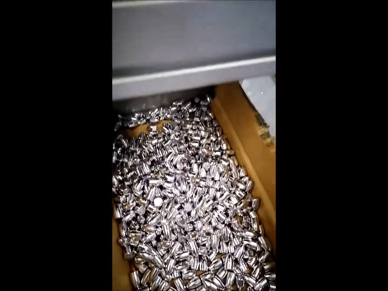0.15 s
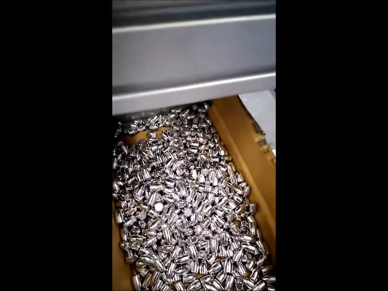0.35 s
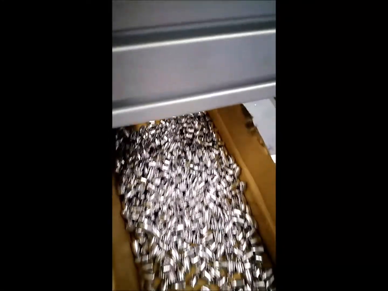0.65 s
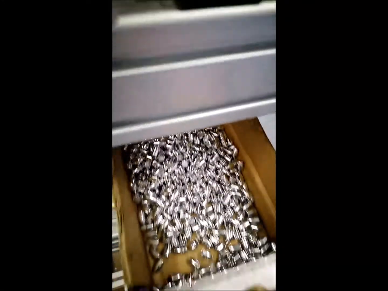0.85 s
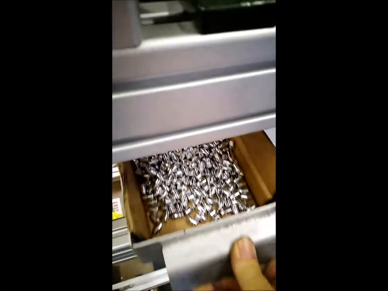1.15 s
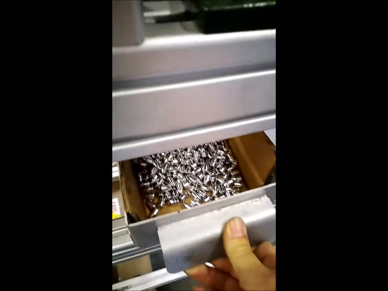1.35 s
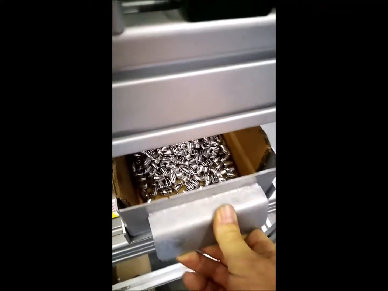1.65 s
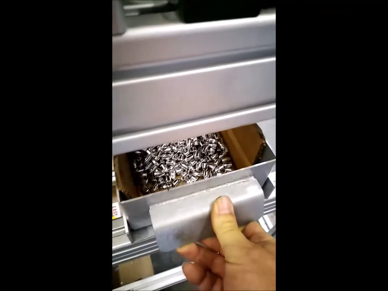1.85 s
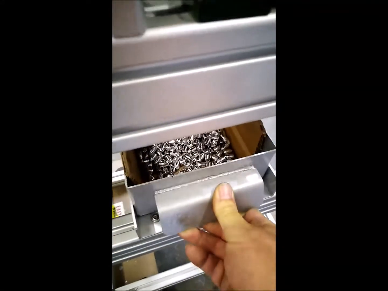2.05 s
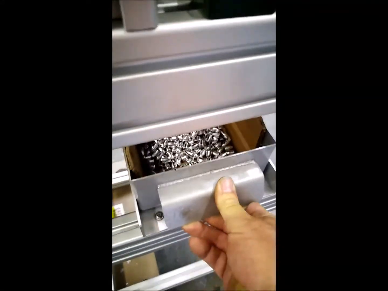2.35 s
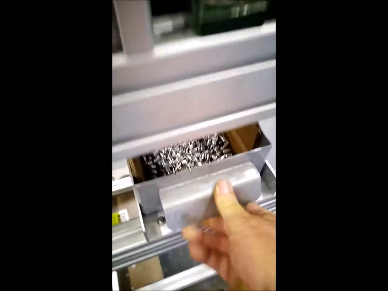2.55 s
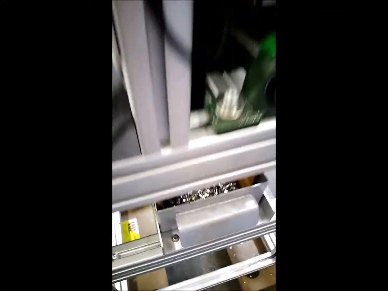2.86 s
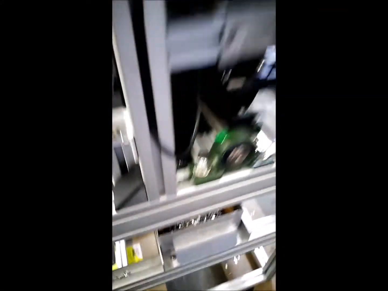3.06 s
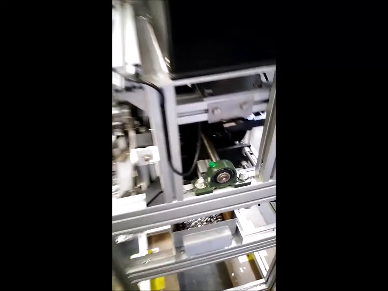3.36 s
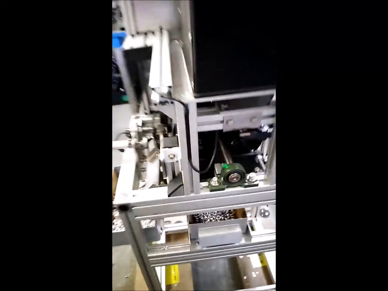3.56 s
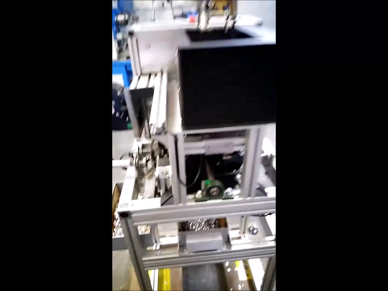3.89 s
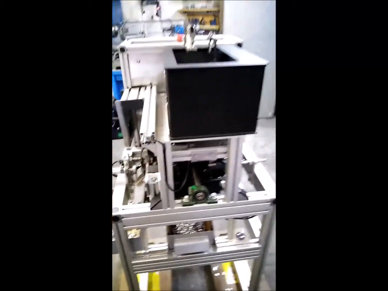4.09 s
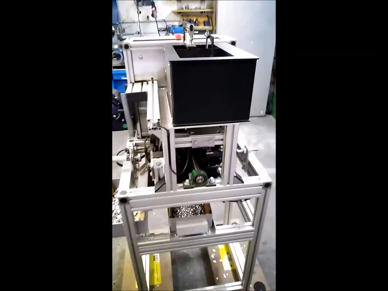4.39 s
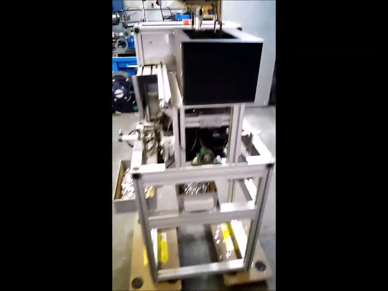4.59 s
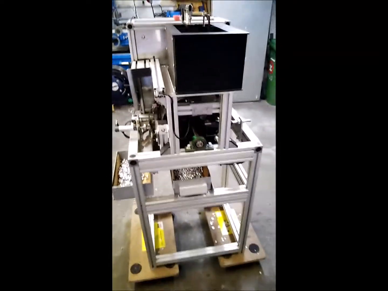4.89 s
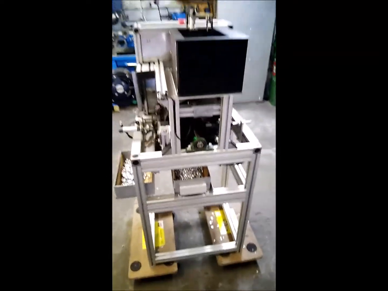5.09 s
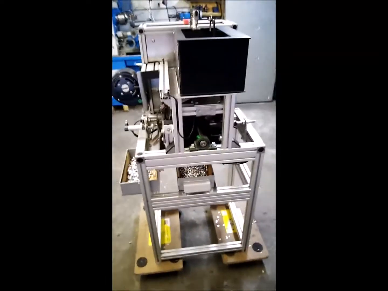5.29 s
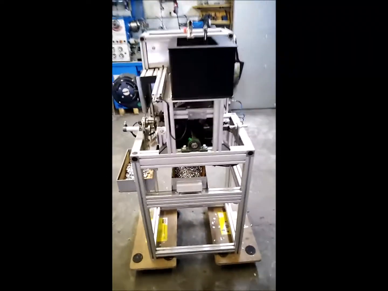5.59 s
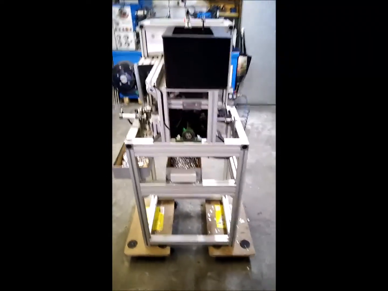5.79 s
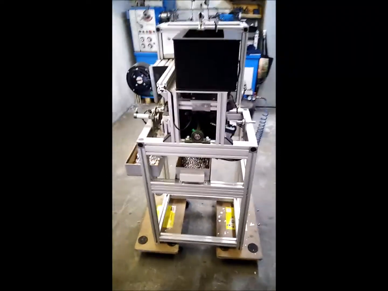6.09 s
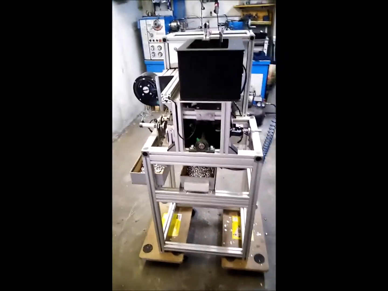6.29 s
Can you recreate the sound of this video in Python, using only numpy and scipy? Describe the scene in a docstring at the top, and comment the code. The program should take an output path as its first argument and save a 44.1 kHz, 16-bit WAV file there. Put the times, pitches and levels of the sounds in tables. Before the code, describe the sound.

A metal tray of small parts scrapes and rustles shut, then a workshop machine fires volleys of crashing steel blows over a whining motor.

```python
"""An automatic casting machine in a hard-walled workshop: noise bursts shaped by the frame's modes make the steel blows.
First come light blows and thumps; a hand pulls out a tray of metal parts, which scrapes (noise) and rustles (tiny rings).
Volleys follow, with bouncing slugs, singing modes, hollow knocks, clanks and dull thumps, over a motor's whine and whirr.
The motor fades as the microphone backs away; squeaks (narrow noise) and shifts of the grip lead to the last volley.
A noise suppressor turns down the pauses throughout."""
import sys
import numpy as np
from scipy import signal
from scipy.fft import rfft, irfft, next_fast_len
from scipy.io import wavfile
from scipy.ndimage import map_coordinates

SR = 44100
rng = np.random.default_rng(int(sys.argv[2]) if len(sys.argv) > 2 else 0)


def bounce(signal):
    """Save signal as a 16-bit WAV file at the path given by the first command-line argument."""
    frames = np.transpose(np.atleast_2d(signal))
    limited = np.clip(frames, -1, 1)
    pcm = np.round(limited * 32767).astype(np.int16)
    wavfile.write(sys.argv[1], SR, pcm)


N = 284004

TIME = np.arange(N) / SR
BLOW_SAMPLES = 3 * SR // 2
CLASH_HZ = 3200  # where the midrange clank gives way to the treble clash


# Steel blows. Each row: start in seconds, level in dB, hardness as treble over midrange in dB,
# tilt of the treble in dB per octave.
STEEL_BLOWS = [(0.142, -27.5, 8.5, -15), (.176, -34.5, 2.5, -10), (.753, -20, -15.5, 8),
               (1.344, -18.5, 6, -2), (1.372, -17, -8, 2), (1.396, -7.5, -0.5, -1), (1.451, -6.5, -6.5, -1),
               (1.472, -17, -5, 3), (1.523, -5, -20, 17), (1.534, 0.5, 3.5, 2), (1.587, -1.5, 4, 7),
               (1.601, -2, -6.5, 3), (1.843, 4, 11, 3), (1.866, -2.5, -25, 16), (1.93, -2.5, 3, -0.5),
               (2.562, -13.5, 8.5, 15), (2.583, -12, 7, -1), (2.609, -8, 6, 6.5), (2.835, -6, 14.5, 5.5),
               (3.078, -13, 6.5, -8), (3.177, -17, 9, 7), (3.229, -9.5, 6, 3.5), (4.423, -40, 6, -3),
               (4.44, -30.5, 5, -8.5), (5.666, -21, 7.5, 3), (5.713, -15, -19, 11),
               (5.775, -9.5, -6.5, -2.5), (5.844, -4, 2.5, -5), (5.914, -3, 2, -3), (6.165, -3, 11.5, -4.5),
               (6.193, -5, -1.5, 12), (6.226, -8.5, 21, 5), (6.278, -6, 9, 3), (6.325, -12, 3, -6)]
# Path to the moving microphone. Each row: time in seconds, room sound in dB, direct sound in dB.
MICROPHONE_PATH = [(0, -10, 4.5), (1.3, -15, -1), (2.7, -3, 7), (3.3, -3.5, 4.5), (4.4, -6, 1),
                   (5.66, -10, -5.5), (5.85, -6.5, -0.5)]


def blows(knock_hz=1100, tilt_hz=7500, snap_db=-4, snap_t60=0.022, ring_t60=0.11, build=0.0065,
          chatter_db=3, rattle_db=0.42, attack=0.005, air_hz=10000, edge_db=7, spot_db=4.5, spot_hz=60):
    """Impact excitation: each blow chatters on the frame, rings briefly and swells into a diffuse room tail."""
    knock_level_db, knock_slope = -3, 0.034  # bass against midrange; dB lost per dB of hardness
    shortening = 0.027  # dB of ring time lost per dB of hardness
    room_t60, room_treble_t60 = 1.328, 0.78  # s
    t, hz = np.arange(BLOW_SAMPLES) / SR, np.fft.rfftfreq(BLOW_SAMPLES, 1 / SR)
    low = 1 / (1 + (hz / knock_hz) ** 8)
    high = 1 - 1 / (1 + (hz / CLASH_HZ) ** 8)
    # heavy contacts stir the low modes, hard ones the high modes
    registers = frame_power(hz) * np.array([low, (1 - low) * (1 - high), high ** 3])
    octaves = np.log2(np.maximum(hz, CLASH_HZ) / tilt_hz)
    # the direct sound keeps a sharp top that the room swallows
    edge = amp(along([(air_hz * .9, 0), (air_hz * 1.2, edge_db)], hz))
    ears, out = spread(hz), np.zeros((2, N))
    # bouncing contacts roughen the blow, loose parts roughen its tail
    chatter = unit(amp(chatter_db * wobble(600, size=N + BLOW_SAMPLES)))
    rattle = unit(amp(rattle_db * wobble(140, size=N + BLOW_SAMPLES)))
    swell = 1 - np.exp(-t / build)
    tails = [swell * fade(t, room_t60), swell * fade(t, room_treble_t60)]
    room_db, direct_db = curves(MICROPHONE_PATH)
    for s, db, hardness_db, tilt_db in STEEL_BLOWS:
        start = round(s * SR)
        stop = start + BLOW_SAMPLES
        direct_gain, room_gain = amp(direct_db[start]), amp(room_db[start])
        power = amp([knock_level_db - knock_slope * hardness_db, 0, hardness_db]) ** 2
        colour = registers * amp(tilt_db * octaves) ** 2
        knock, clank, clash = colour * (power / colour.sum(1) / power.sum())[:, None]
        # each blow lands on another spot and favours other modes
        spot = amp(spot_db * wobble(SR / spot_hz * hz[1], size=len(hz)) * hz / (hz + knock_hz))
        # distance blurs the attack as it weakens the direct sound
        rise = 1 - np.exp(-t * direct_gain / attack)
        decay = fade(t, ring_t60 * amp(-shortening * hardness_db)) + amp(snap_db) * fade(t, snap_t60)
        struck = noise(spot * np.sqrt(knock + clank + clash) * edge, ears)
        direct = rise * decay * chatter[start:stop] * struck
        room = 0
        for part, tail in zip([knock + clank, clash], tails):
            room = room + tail * np.sqrt(part.sum()) * noise(spot * np.sqrt(part / edge), ears)
        add(out, s, amp(db) * (direct_gain * direct + room_gain * rattle[start:stop] * room))
    return out


# Colour of the struck machine. Each row: frequency in Hz, relative density in dB per Hz.
STEEL_COLOUR = [(30, -40), (120, -19), (155, -13.5), (253, -5.5), (428, -11.5), (740, -5), (1000, -6.5),
                (1310, -2), (2170, 4), (2750, 1), (3200, -1.5), (5600, 4), (6500, 8), (7600, 13.5),
                (9150, 6.5), (10300, -1.5), (14000, -22)]
# Broad resonances and antiresonances of the frame. Each row: frequency in Hz, gain in dB.
FRAME_HUMPS = [(1033, -3), (3057, -3.5), (4134, 4), (7708, 3.5)]


def frame_power(hz, hump_hz=65, fine_db=1.8, fine_hz=25):
    """Modal density: crowded modes give the frame's power response humps and ripples."""
    humps = sum(db * np.exp(-((hz - f) / hump_hz) ** 2) for f, db in FRAME_HUMPS)
    ripples = fine_db * wobble(SR / fine_hz * hz[1], size=len(hz))
    return amp(along(STEEL_COLOUR, hz) + humps + ripples) ** 2


def rebounds(count=10, scatter_db=3, t60=0.02, low_hz=1600, high_hz=10000):
    """Inelastic rebound: slugs jump at each blow and land at uneven moments, the later the weaker."""
    mean_wait, level_db, loss_db_per_s = .11, -6.5, 58  # s, dB against the blow, dB per s of wait
    t, out = np.arange(SR // 20) / SR, np.zeros((2, N))
    for s, db, hardness_db, *_ in STEEL_BLOWS:
        for wait in rng.exponential(mean_wait, count):
            hz = low_hz * (high_hz / low_hz) ** rng.random(6)
            weights = amp(along(STEEL_COLOUR, hz) + hardness_db * (hz > CLASH_HZ))
            weights = weights * rng.standard_normal((2, len(hz)))
            tones = np.sin(2 * np.pi * hz[:, None] * t)
            clink = weights / np.linalg.norm(weights) @ tones * fade(t, t60)
            landing_db = db + level_db - loss_db_per_s * wait + scatter_db * rng.standard_normal()
            add(out, min(s + wait, TIME[-1]), amp(landing_db) * clink)
    return out


# Square hits that set the clearest modes singing. Each row: start in seconds, level in dB.
SQUARE_HITS = [(1.602, -28), (1.93, -16), (2.837, -30.5), (6.225, -18)]
# The frame's clearest modes. Each row: frequency in Hz, level in dB before random variation.
CLEAR_MODES = [(1748, -9.5), (1942, -1.5), (2094, -1.5), (4860, -10.5), (5771, -8), (6208, -2), (6676, -3),
               (6885, -1), (7253, -4), (7745, -4.5), (7827, -4), (8135, -8), (8869, -5.5), (9178, -3.5)]


def singing(t60=0.78, attack=0.007, vary_db=-2.5, waver=0.5):
    """Modal ringing: lightly damped modes sing on, in a new mixture for each hit and each ear."""
    t, out = np.arange(SR) / SR, np.zeros((2, N))
    for s, db in SQUARE_HITS:
        for hz, level_db in CLEAR_MODES:
            phase = 2 * np.pi * (hz * t + rng.random((2, 1))) + waver * wobble(30, size=SR)
            gain = amp(db + level_db + vary_db * rng.standard_normal((2, 1)))
            add(out, s, gain * np.sin(phase) * fade(t, t60) * (1 - np.exp(-t / attack)))
    return out


# Hollow knocks, and the short midrange clanks that ring with steel blows. Each row: start in seconds,
# pitch in Hz, level in dB before the microphone path.
KNOCKS_AND_CLANKS = [(0.132, 420, -24.5), (1.398, 1590, -16), (1.451, 540, -6), (1.459, 2120, -5),
                     (1.6, 1750, 3), (1.609, 800, -7), (1.978, 2160, -8.5), (2.57, 610, -16),
                     (2.974, 696, -13), (3.025, 800, -13), (3.027, 1470, -18.5), (3.047, 755, -11.5),
                     (3.081, 427, -13.5), (3.174, 687, -16), (3.229, 2360, -15.5), (4.44, 562, -21),
                     (4.44, 1525, -22), (4.444, 900, -25.5), (5.695, 724, -18.5), (5.849, 1464, -5.5),
                     (5.864, 600, -12), (5.915, 1364, -2)]


def knocks_and_clanks(attack=0.0032, t60=0.042, width_hz=210, echo_db=-8, build=0.0086, room_t60=0.87):
    """Damped resonance: each knock or clank is a short ring of noise around its pitch, with a room echo."""
    t, hz, out = np.arange(SR) / SR, np.fft.rfftfreq(SR, 1 / SR), np.zeros((2, N))
    ears, (room_db, direct_db) = spread(hz), curves(MICROPHONE_PATH)
    direct = (1 - np.exp(-t / attack)) * fade(t, t60)
    echo = (1 - np.exp(-t / build)) * fade(t, room_t60)
    for s, centre, db in KNOCKS_AND_CLANKS:
        start = round(s * SR)
        shape = amp(direct_db[start]) * direct + amp(room_db[start] + echo_db) * echo
        resonance = 1 / (1 + (2 * (hz - centre) / width_hz) ** 2) * hz / (hz + width_hz)
        add(out, s, amp(db) * shape * noise(resonance, ears))
    return out


# Pull on the tray. Each row: time in seconds, effort in dB, groan of the rails in Hz.
TRAY_PULL = [(.48, -12.5, 395), (0.559, -5, 410), (0.657, 0, 430), (0.799, -0.5, 440), (0.9, -.5, 515),
             (1.1, -3, 505), (1.358, -4.5, 530)]
# Scrape of the rails. Each row: frequency in Hz, relative density in dB per Hz.
SCRAPE_COLOUR = [(50, -59), (200, -19.5), (330, -13), (510, 1), (570, -6), (650, 3.5), (850, -7.5),
                 (1100, -24), (2500, -71)]
# Rustle of the small parts. Each row: frequency in Hz, relative density in dB per Hz.
PARTS_COLOUR = [(250, -60), (900, 1.5), (1950, 0.5), (2700, -3.5), (3500, -10.5), (5500, -9), (8300, -4),
                (14000, -28)]


def tray(scrape_db=-32.0, groan_db=-38, left_db=-4, right_db=2, rustle_db=-32, rustle_grows=1.77,
         grain_db=-0.6, clink_db=-4):
    """Stick-slip friction: the tray groans on its rails; a harder pull jostles the parts more."""
    slip_db, slip_rate = 1.2, 140  # unevenness in dB, knots per second
    effort_db, groan_hz = curves(TRAY_PULL)
    moving = np.interp(TIME, [.47, .49, 1.38, 1.45], [0, 1, 1, 0])
    rubbing = amp(scrape_db + effort_db) * rush(SCRAPE_COLOUR)
    groan = amp(groan_db + 0.66 * effort_db) * band(groan_hz, width_hz=45)[0]
    slips = unit(amp(slip_db * wobble(slip_rate)))
    scrape = amp([[left_db], [right_db]]) * slips * (rubbing + groan)
    rustle = unit(amp(grain_db * wobble(550))) * rush(PARTS_COLOUR, ripple_db=4)
    parts = amp(rustle_db + rustle_grows * effort_db) * (rustle + amp(clink_db) * clinks())
    return moving * (scrape + parts)


def clinks(count=1500, scatter_db=3.0):
    """Random collisions: a dense stream of tiny rings, each at its own pitch and place."""
    t, out = np.arange(SR // 50) / SR, np.zeros((2, N))
    start, span = TRAY_PULL[0][0], TRAY_PULL[-1][0] - TRAY_PULL[0][0]
    for when, pitch, size, left, right in rng.random((count, 5)):
        hz, t60 = 1300 * 7 ** pitch, .015
        gain = amp(along(PARTS_COLOUR, hz) - scatter_db * np.log(size + 0.024)) * np.sqrt(hz)
        ring = np.sin(2 * np.pi * hz * t) * fade(t, t60)
        add(out, start + when * span, gain * np.array([[left], [right]]) * ring)
    return unit(out) * np.sqrt(span * SR / N)  # rms 1 over the span of the pull


# Dull thumps on the frame. Each row: start in seconds, level in dB, decay time t60 in seconds.
FRAME_THUMPS = [(0.135, -41, 0.32), (0.75, -32.5, 0.49), (2.568, -33, 0.45), (2.652, -28.5, 1),
                (2.975, -37.5, 0.28), (3.025, -29.5, 0.52), (3.08, -8.5, 0.33), (3.125, -12.5, 0.37),
                (3.229, -17, 0.55)]
# Panel modes. Each row: frequency in Hz, level in dB, decay time as a multiple of the thump's.
PANEL_MODES = [(103.3, -15.5, 1), (157.7, 0, 1), (179.3, -3, 1), (235, -4.5, 1), (285.4, -0.5, 0.5)]


def thumps(attack=0.0017, waver=0.96):
    """Low-mode excitation: soft heavy contacts boom in panels that shake unevenly."""
    t, out = np.arange(SR) / SR, np.zeros(N)
    for s, db, t60 in FRAME_THUMPS:
        ring = np.zeros(SR)
        for hz, level_db, life in PANEL_MODES:
            phase = 2 * np.pi * hz * t + waver * wobble(45, size=SR)
            ring += amp(level_db) * np.sin(phase) * fade(t, t60 * life)
        add(out, s, amp(db) * ring * (1 - np.exp(-t / attack)))
    return out


# Squeaks, a short burst of noise and a low ring. Each row: start in seconds, length in seconds,
# start pitch in Hz, end pitch in Hz, bandwidth setting in Hz, level in dB.
NOISE_BANDS = [(0.409, 0.027, 1220, 1235, 94, -47), (0.642, 0.24, 1895, 1893, 44, -37),
               (4.052, 0.11, 1864, 1840, 69, -49.5), (4.487, 0.2, 1308, 1510, 420, -47),
               (4.962, 0.053, 1190, 1217, 103, -53), (5.146, 0.073, 1267, 1304, 78, -53),
               (5.662, 0.056, 2300, 2324, 680, -37), (6.191, 0.15, 251, 247.7, 18.8, -26.5)]


def squeaks_burst_and_ring(attack=0.0023, t60=0.32, upper_ratio=1.4, upper_db=-15):
    """Band-limited noise: narrow or wide bands flutter, hold or glide in pitch, with a weak upper band."""
    t, out = np.arange(SR) / SR, np.zeros((2, N))
    for s, length, start_hz, end_hz, width_hz, db in NOISE_BANDS:
        hz = np.interp(t, [0, length], [start_hz, end_hz])
        bands = band(hz, width_hz) + amp(upper_db) * band(upper_ratio * hz, width_hz)
        add(out, s, amp(db) * stroke(length, attack, t60) * flutter(size=SR) * bands)
    return out


# Shifts of the grip. Each row: start in seconds, length in seconds, push level in dB before the ear gains.
GRIP_SHIFTS = [(5.216, 0.08, -43.5), (5.373, 0.021, -31.5), (5.414, 0.072, -44)]


def bumps(attack=0.0043, t60=0.11, left_db=-20, right_db=3, rustle_db=-56):
    """Handling noise: the grip shifts beside the right microphone, with low rumble and a rustle of skin."""
    push, rub = np.zeros(N), np.zeros(N)
    for s, length, db in GRIP_SHIFTS:
        add(push, s, amp(db) * stroke(length, attack, t60))
        add(rub, s, stroke(length, attack, t60))
    rumble = rush([(30, -22.5), (75, 0.0), (115, 6), (240, -25.5), (600, -70.0)])
    return amp([[left_db], [right_db]]) * push * rumble + amp(rustle_db) * rub * rush(SHOP_COLOUR)


# Motor whine. Each row: time in seconds, pitch in Hz, level in dB.
MOTOR_WHINE = [(0, 812, -48.5), (.4, 808.7, -42), (2.5, 815, -36), (3.85, 822.5, -50.5), (3.97, 822, -66),
               (4.85, 813, -62), (4.95, 825, -54), (5.12, 817, -62)]
# Whirr of the drive. Each row: frequency in Hz, relative density in dB per Hz.
WHIRR_COLOUR = [(300, -61), (1000, -16), (1750, -20), (2200, -1.5), (3200, -4), (3600, -23), (5000, -11),
                (7500, -3.5), (9200, -10.5), (11500, -55)]
# Air of the shop. Each row: frequency in Hz, relative density in dB per Hz.
SHOP_COLOUR = [(24, -26.5), (90, -10), (250, -3.5), (1800, -6), (4000, -20), (7800, -31), (14000, -48)]


def motor(waver=0.62, drift=0.95, whirr_db=-55, whirr_follows=0.62, shop_db=-53.0):
    """Phase modulation: a whine wavers over the drive's resonant whirr and the faint air of the shop."""
    hz, db = curves(MOTOR_WHINE)
    phase = 2 * np.pi * np.cumsum(hz) / SR + drift * wobble(9.0)
    whine = flutter() * np.sin(phase + waver * wobble(60))
    whirr_level_db = whirr_db + whirr_follows * (db - db[0]) + 0.93 * wobble(32)
    whirr = amp(whirr_level_db) * rush(WHIRR_COLOUR, ripple_db=4.5)
    air = amp(shop_db + 0.88 * wobble(15)) * rush(SHOP_COLOUR)
    return amp(db) * unit(whine) + whirr + air


# Thresholds of the noise suppressor. Each row: frequency in Hz, density in dB per Hz.
SUPPRESSOR_THRESHOLDS = [(150, -77), (600, -64.5), (2000, -69), (4000, -85), (8000, -89)]


def suppress(x, slope=0.87, depth_db=21):
    """Downward expansion: each band loses slope dB per dB below threshold, to depth_db at most."""
    size, hop, follow_s = 512, 128, .014
    hz, _, z = signal.stft(x, SR, nperseg=size, noverlap=size - hop)
    keep = np.exp(-hop / (follow_s * SR))
    power = np.mean(np.abs(z) ** 2, axis=0)
    density = signal.lfilter([1 - keep], [1, -keep], power) * size / SR
    under_db = 10 * np.log10(density + 1e-20) - along(SUPPRESSOR_THRESHOLDS, hz)[:, None]
    gain = amp(np.clip(slope * under_db, -depth_db, 0))
    return signal.istft(z * gain, SR, nperseg=size, noverlap=size - hop)[1][:, :N]


# Stereo width. Each row: frequency in Hz, side minus mid in dB.
STEREO_WIDTH = [(40, -7.5), (230, -13.5), (550, -9), (1100, 0), (12000, 1)]
# Stereo balance. Each row: frequency in Hz, left minus right in dB.
STEREO_LEAN = [(100, -1), (800, -0.5), (1200, 2), (2400, 5), (3700, 0), (5500, 1), (7300, -4.5), (8100, 2),
               (8900, 4.5), (12000, 0)]


def spread(hz, lag=0.000311):
    """Interaural coherence: mid and side weights keep bass alike, part the treble and delay the left ear."""
    side, lean = amp(along(STEREO_WIDTH, hz)), amp(along(STEREO_LEAN, hz) / 2)
    left = lean * np.exp(-2j * np.pi * hz * lag)
    return np.array([[left, left * side], [1 / lean, -side / lean]]) / np.sqrt(1 + side ** 2)


def noise(gain, ears):
    """Spectral shaping: random phases and the given gain on the FFT grid make stereo noise of rms 1."""
    white = rng.standard_normal((2, len(gain))) + 1j * rng.standard_normal((2, len(gain)))
    return unit(irfft((ears * white).sum(1) * gain))


def rush(spectrum, ripple_db=0, ripple_hz=110):
    """Broadband noise: a (Hz, dB) spectrum carries narrow random resonances."""
    hz = np.fft.rfftfreq(2 * next_fast_len(N // 2 + 1), 1 / SR)
    ripples = ripple_db * wobble(SR / ripple_hz * hz[1], size=len(hz))
    return noise(amp(along(spectrum, hz) + ripples), spread(hz))[:, :N]


def band(hz, width_hz):
    """Quadrature modulation: random curves turn a pitch given per sample into a stereo band of noise."""
    phase, size = 2 * np.pi * np.cumsum(hz) / SR, len(hz)
    ears = []
    for _ in range(2):
        ears.append(wobble(width_hz, size) * np.sin(phase) + wobble(width_hz, size) * np.cos(phase))
    return unit(np.array(ears))


def flutter(size=N):
    """Amplitude modulation: the level wavers quickly and unevenly, partly different in each ear."""
    depth_db, rate = 2.6, 32  # rate in knots per second
    shared = depth_db * wobble(rate, size)
    return unit(amp(shared + np.array([wobble(16, size), wobble(20, size)])))


def stroke(length, attack, t60):
    """Envelope: one second holding a rise, a hold for length and an exponential release."""
    t = np.arange(SR) / SR
    return (1 - np.exp(-t / attack)) * fade(np.maximum(t - length, 0), t60)


def fade(t, t60):
    """Exponential damping: free decay by 60 dB in t60 seconds."""
    return np.exp(-np.log(1000) * t / t60)


def wobble(rate, size=N):
    """Band-limited fluctuation: a smooth random curve with rate knots a second."""
    knots = rng.standard_normal(int(size * rate / SR) + 4)
    grid = np.arange(0, len(knots) - 1, .125)
    return np.interp(np.arange(size) * (rate / SR), grid, map_coordinates(knots, [grid]))


def along(points, hz):
    """Logarithmic frequency: read (Hz, value) points on a log axis."""
    f, v = np.transpose(points)
    return np.interp(np.log(hz + 1), np.log(f + 1), v)


def curves(rows):
    """Linear interpolation: one value per sample for each column after the time."""
    s, *cols = np.transpose(rows)
    return [np.interp(TIME, s, c) for c in cols]


def amp(db):
    """Level to amplitude: decibels become gain."""
    return 10 ** (np.asarray(db) / 20)


def unit(x):
    """Normalisation: scale to rms 1."""
    return x / np.sqrt(np.mean(x ** 2) + 1e-20)


def add(track, s, x):
    """Superposition: mix x into the track at s seconds."""
    start = max(round(s * SR), 0)
    track[..., start:start + x.shape[-1]] += x[..., :N - start]


def scene():
    """Superposition: machine, tray and hand sound together."""
    impacts = blows() + rebounds() + singing() + knocks_and_clanks()
    machine = impacts + squeaks_burst_and_ring() + thumps()
    return machine + bumps() + tray() + motor()


def record(dry, ceiling=0.74, low_cut_hz=40, top_hz=14200):
    """Expansion, soft limiting and band limiting: pauses are turned down, peaks rounded, extremes cut."""
    gated = suppress(dry)
    held = gated / (1 + np.abs(gated / ceiling) ** 6) ** (1 / 6)
    size = next_fast_len(N + SR // 2)
    hz = np.fft.rfftfreq(size, 1 / SR)
    low_pass = 1 / np.sqrt(1 + (hz / top_hz) ** 160)
    high_pass = hz / (hz - 1j * low_cut_hz)
    return irfft(rfft(held, size) * low_pass * high_pass, size)[:, :N]


dry = scene()
out = record(dry)
bounce(out)
```